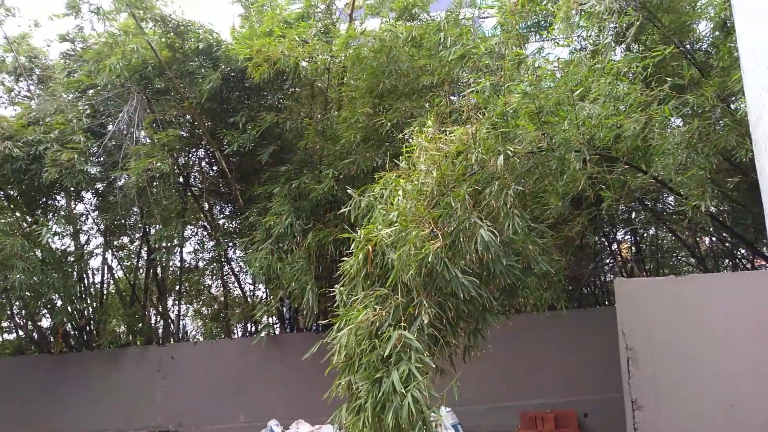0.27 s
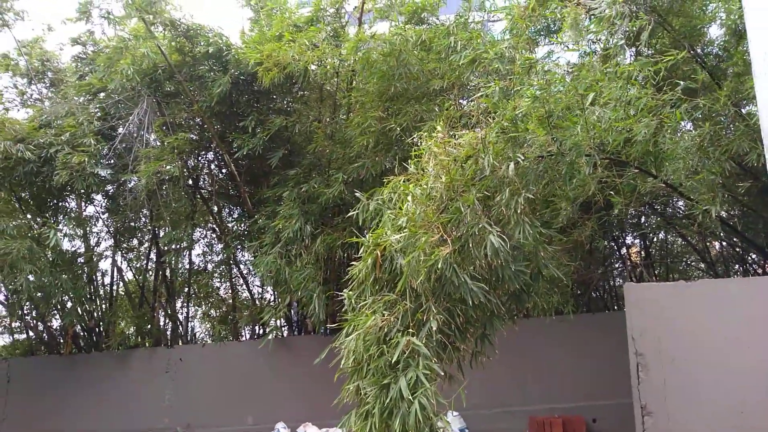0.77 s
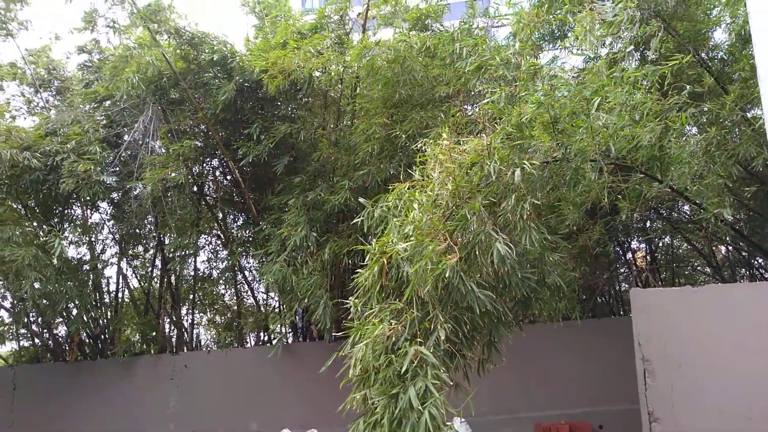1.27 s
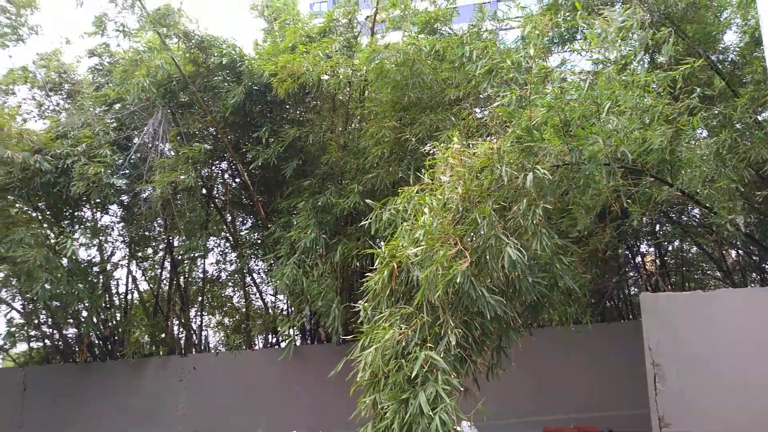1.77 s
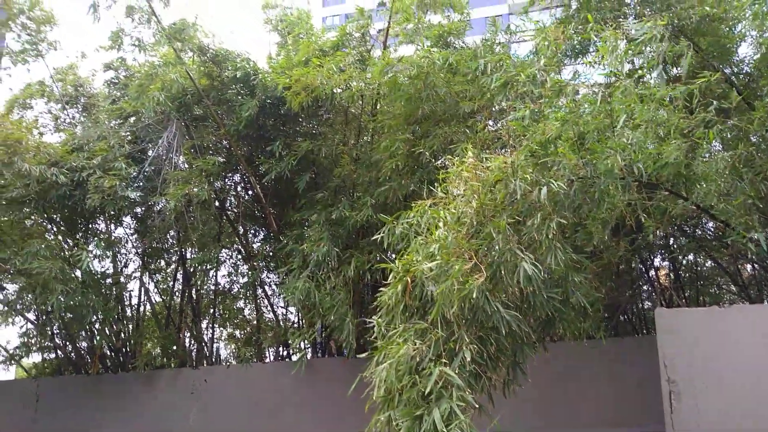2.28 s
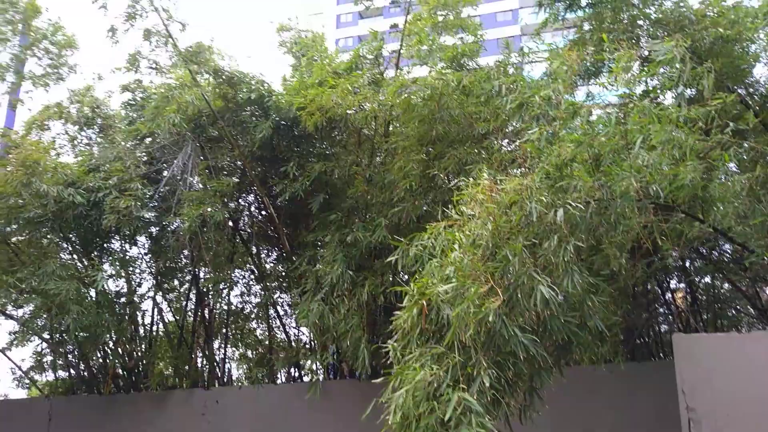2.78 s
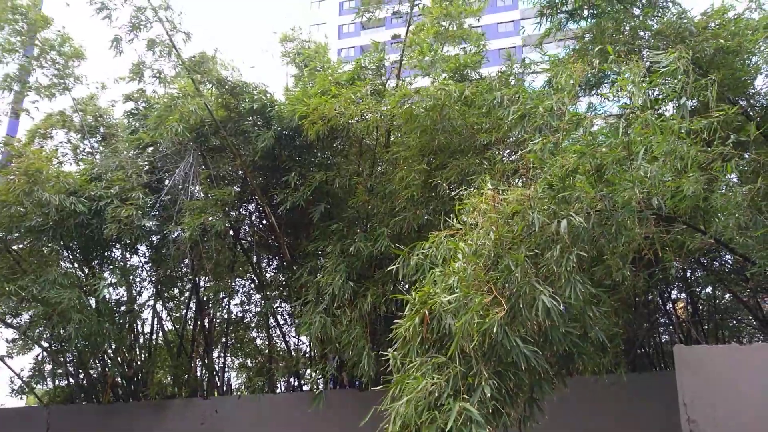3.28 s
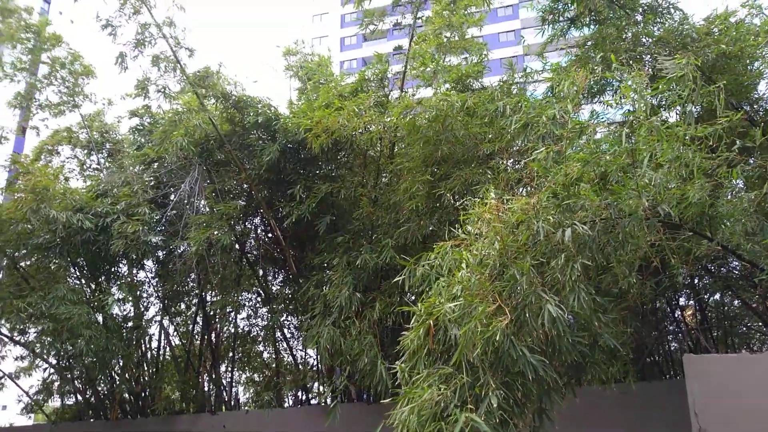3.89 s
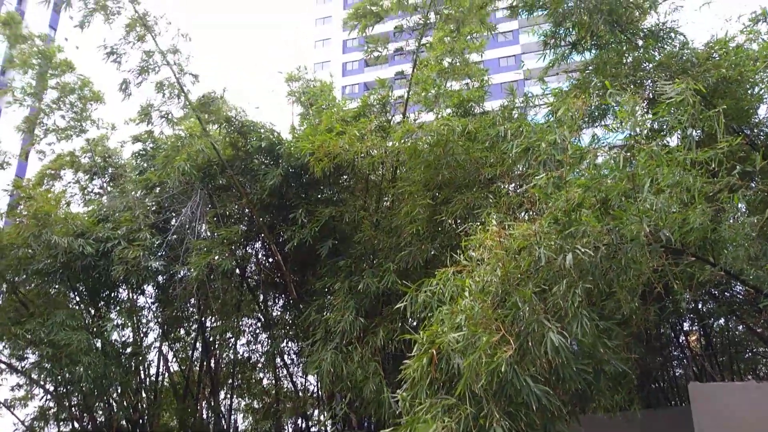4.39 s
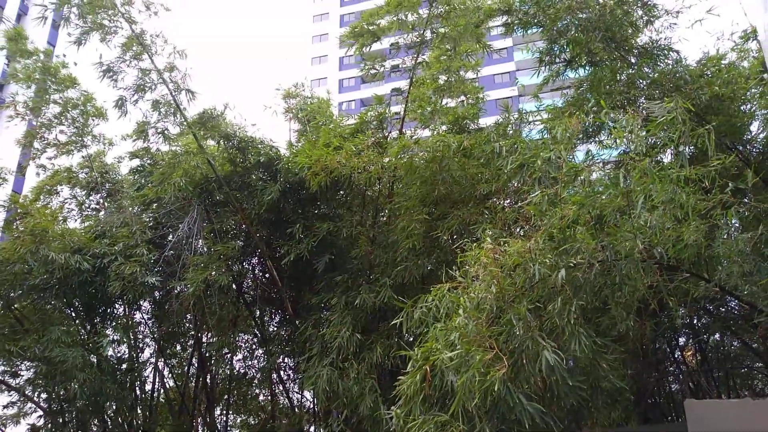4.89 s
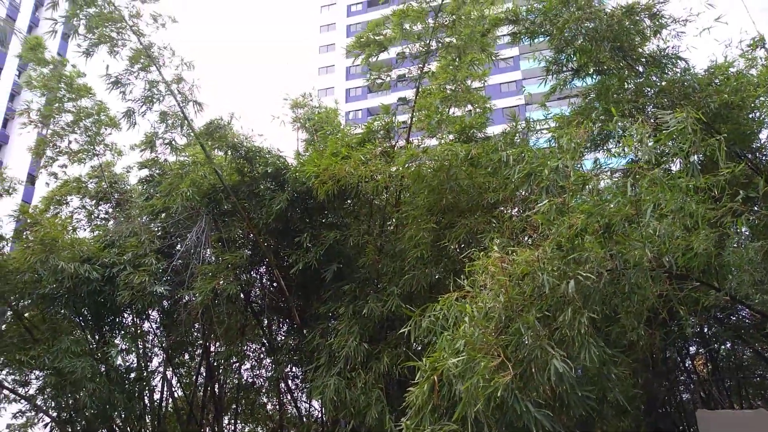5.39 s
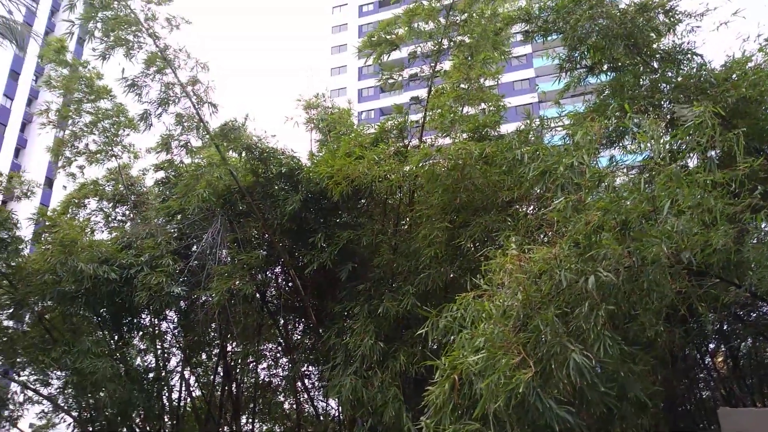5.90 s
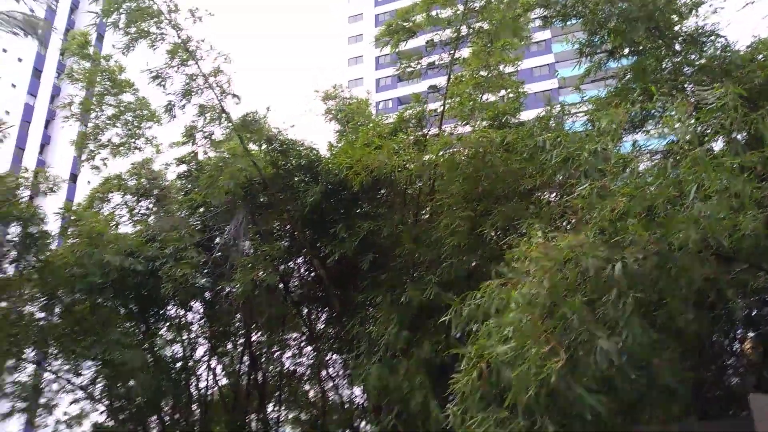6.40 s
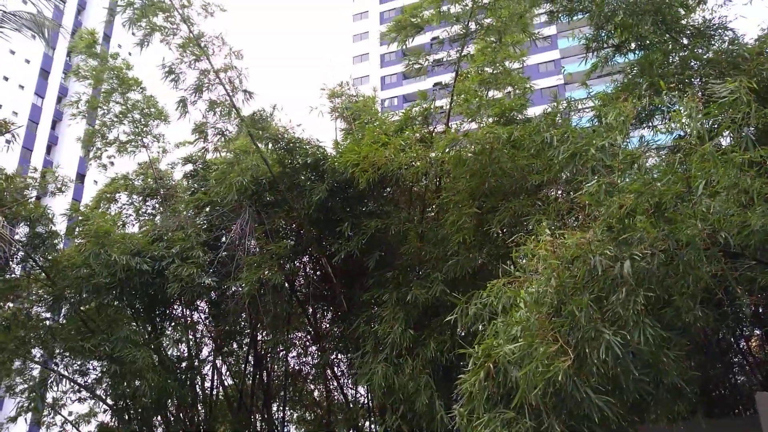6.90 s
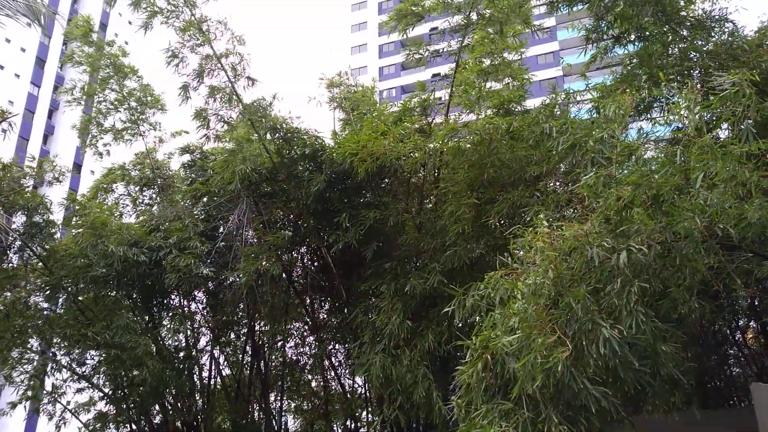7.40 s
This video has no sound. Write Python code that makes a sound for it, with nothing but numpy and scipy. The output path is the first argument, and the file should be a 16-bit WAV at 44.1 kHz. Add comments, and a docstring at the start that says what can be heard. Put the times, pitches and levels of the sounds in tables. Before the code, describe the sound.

A stereo microphone near bamboo picks up even, bright leaf hiss throughout, over an unsteady low machine hum, faint fan drones and dull distant city noise. Faint high bird notes start at once, bunch into a quick twitter, then thin out, smeared by wall reflections. Small dry stem ticks come now and then, sharpest in the later part as the breeze turns more uneven.

```python
"""A light wind rustles bamboo in a walled yard, over a city wash and a throbbing hum; both last throughout.
A small bird sings a first thin note at once; its sliding whistles crowd together from 1.3 s, then thin out.
From about 4 s the wind comes in shorter swells; the sharpest stem clicks come near 5.5 and 6.9 s.
Leaves, boughs, stems, streets and a low rumble are shaped noise; the hum is blurred tones beating together.
The bird is sine waves with bent pitch, smeared by echoes from the walls."""
import sys
import numpy as np
from scipy import signal
from scipy.fft import rfft, irfft
from scipy.io import wavfile
from scipy.ndimage import uniform_filter1d

SR = 44100
rng = np.random.default_rng(int(sys.argv[2]) if len(sys.argv) > 2 else 0)


def store_wav(level_fs):
    """Save 16-bit WAV to argv[1]."""
    pcm = np.round(np.clip(np.atleast_2d(level_fs), -1, 1) * 32767)
    wavfile.write(sys.argv[1], SR, pcm.T.astype(np.int16))


N = 337317  # length in samples

# Wind in the leaves; only the rise and fall about each column's mean is used.
# Each row: time in seconds, level of the fine leaf rustle in dB, level of the deeper bough swish in dB.
WIND_SWELL = [(0.0, -60, -64), (.12, -62.5, -60), (.35, -62.5, -62.5), (.88, -62, -58.5),
              (1.08, -62, -57.5), (1.4, -63, -60), (1.83, -62, -60.5), (2.3, -61.5, -61),
              (2.75, -62, -61.5), (3.05, -62, -60.5), (3.35, -62.5, -61), (3.55, -62, -62.5),
              (3.82, -65.5, -68), (4.2, -65, -59), (4.42, -63, -60), (4.7, -64, -62.5), (4.92, -62.5, -59),
              (5.25, -66.5, -66), (5.52, -60.5, -58), (5.85, -67, -60), (6.15, -65.5, -63.5),
              (6.35, -62.5, -61.5), (6.78, -65, -61), (6.9, -59.5, -62), (7.1, -63.5, -63),
              (7.45, -60.5, -60.5), (7.65, -61.5, -59.5)]
# Hiss of the leaves. Each row: frequency in Hz, level in dB per Hz before the rustle's own strength.
LEAF_SPECTRUM = [(500, -125), (2000, -101), (3600, -100.5), (5000, -94), (7500, -94), (9500, -93.5),
                 (11000, -99), (12500, -103), (14500, -106)]
# Swish of whole boughs. Each row: frequency in Hz, level in dB per Hz before the wind's swell.
BOUGH_SPECTRUM = [(1000, -120), (2600, -100), (4300, -102), (7000, -115)]
# Stems clicking together. Each row: start in seconds, starting level in dB before echo and flutter,
# centre in Hz, reach to either side in octaves, time to fade by 60 dB in seconds.
STEM_CLICKS = [(.037, -54, 2500, .5, .03), (.367, -53, 2800, .7, .03), (.558, -55, 2700, .5, .04),
               (.935, -56, 6000, .9, .12), (2.235, -55, 11000, .4, .15), (2.279, -50, 11500, .35, .03),
               (2.49, -44.5, 9400, .22, .06), (2.99, -46.5, 2500, .4, .04), (3.462, -50, 2400, .35, .03),
               (3.525, -58, 11500, .4, .15), (3.955, -51, 5200, .7, .015), (5.355, -52, 6000, .9, .03),
               (5.511, -39, 7000, .9, .011), (5.529, -41.5, 5500, .9, .022), (6.288, -44, 8800, .45, .025),
               (6.842, -48.5, 2650, .35, .1), (6.853, -46, 2700, .35, .05), (6.845, -47.5, 5800, .5, .1),
               (6.846, -52, 11000, .25, .14), (6.898, -36.5, 8400, .6, .008), (6.95, -50, 6000, .9, .03),
               (7.015, -51, 5500, .9, .025)]
# Bird notes. Each row: start in seconds, length in seconds, first, middle and last pitch in Hz,
# level in dB before echo, buzz as the share by which the pitch quivers.
BIRD_NOTES = [(0.0, 0.12, 4950, 5570, 5970, -57.5, 0.038), (0.527, .052, 5550, 5130, 4720, -58, .04),
              (.95, 0.29, 4250, 4450, 4850, -63, .05), (1.301, .06, 7520, 7570, 7650, -55, 0.0065),
              (1.367, 0.11, 7780, 7620, 7560, -51, 0.013), (1.504, 0.068, 8500, 7600, 6000, -54, 0.037),
              (1.61, 0.097, 7700, 8150, 8500, -56.5, .05), (1.69, .1, 4900, 4950, 4900, -61, .025),
              (1.707, 0.088, 7550, 7220, 7180, -50.5, .016), (1.835, 0.066, 8150, 8240, 8200, -55.5, .016),
              (1.857, .04, 7700, 6900, 6250, -56, 0.042), (1.929, 0.089, 8200, 7630, 7060, -57.5, .035),
              (2.007, 0.07, 7000, 6150, 6120, -51, 0.013), (2.123, 0.097, 6250, 6220, 6100, -56, 0.021),
              (2.18, .045, 7600, 7500, 7300, -55, .024), (2.203, 0.07, 6700, 5650, 4900, -54, 0.02),
              (2.33, 0.096, 7100, 6550, 6160, -56, 0.032), (2.414, .13, 5400, 5020, 4950, -57, 0.02),
              (2.582, 0.055, 7600, 6480, 5600, -52.5, .05), (2.63, 0.063, 5450, 4900, 4300, -56.5, .04),
              (2.993, 0.03, 7870, 8000, 8100, -53, .012), (3.003, 0.084, 10100, 9000, 8300, -57, .055),
              (3.025, .05, 5100, 4900, 4650, -63, 0.022), (3.185, 0.085, 7800, 7400, 6900, -59, 0.018),
              (3.265, 0.055, 6800, 6180, 5730, -54, 0.032), (3.314, .11, 5750, 5600, 5550, -58, 0.018),
              (3.576, 0.14, 5000, 5560, 6050, -58.5, .026), (4.005, .045, 9450, 8880, 8200, -53.5, .03),
              (4.385, .07, 10200, 9950, 9700, -61, .05), (4.72, 0.098, 4400, 4460, 4530, -59, .016),
              (4.791, 0.18, 4650, 6150, 7240, -58, 0.04), (5.172, 0.11, 6900, 6020, 5100, -59, 0.06),
              (5.28, 0.21, 5100, 4750, 5100, -60.5, 0.078), (5.667, 0.085, 6000, 5920, 5900, -57, 0.0086),
              (6.475, 0.16, 6950, 7850, 8100, -58.5, .052), (6.645, 0.048, 7300, 6250, 5550, -55, 0.055),
              (6.686, 0.125, 5750, 5600, 5520, -57.5, 0.042)]
# Swell of the distant machinery. Each row: time in seconds, hum level in dB before a small trim.
HUM_SWELL = [(0.0, -46.5), (.55, -45), (1.1, -39), (1.3, -44), (1.53, -41), (1.75, -44), (2.1, -38.5),
             (2.24, -55), (2.36, -36), (2.47, -49.5), (2.57, -37), (2.72, -40.5), (2.86, -52),
             (3.03, -35.5), (3.3, -44), (3.49, -37), (3.62, -40), (3.87, -47), (4.08, -38), (4.32, -45.5),
             (4.58, -40), (4.76, -43), (4.88, -36.5), (5.05, -37.5), (5.22, -50), (5.4, -39.5),
             (5.6, -37.5), (5.9, -41), (6.18, -45.5), (6.32, -39.5), (6.65, -42.5), (6.85, -40.5),
             (7.2, -46.5), (7.4, -41), (7.65, -45)]
# Faint drones of far fans. Each row: frequency in Hz, level in dB.
FAN_DRONES = [(174, -57), (202, -59.5), (253, -58), (297, -63), (592, -65.5)]
# Swell of the low rumble; only the rise and fall about the mean is used.
# Each row: time in seconds, level in dB.
RUMBLE_SWELL = [(0.0, -45), (.5, -48.5), (0.93, -52), (1.1, -48.5), (1.55, -47.5), (1.75, -51), (2.05, -44),
                (2.23, -52), (2.36, -46.5), (2.85, -48.5), (3.48, -46.5), (3.7, -57), (4.0, -46),
                (4.25, -51), (4.6, -47), (4.95, -57), (5.15, -47), (6.2, -52), (6.52, -48), (6.8, -52),
                (7.65, -52)]
# Low unsteady rumble near 60 Hz, perhaps a fan.
# Each row: frequency in Hz, level in dB per Hz before the rumble's swell.
RUMBLE_SPECTRUM = [(20, -100), (33, -84), (45, -80.5), (56, -61), (68, -63.5), (88, -72), (160, -97),
                   (400, -130)]
# Wash of the city. Each row: frequency in Hz, level in dB per Hz before its slow swell.
CITY_SPECTRUM = [(40, -105), (90, -68.5), (128, -65), (150, -66), (180, -66.5), (300, -71), (520, -72.5),
                 (660, -75), (1000, -77), (1200, -81), (1600, -83.5), (2200, -88.5), (3300, -98),
                 (9000, -120)]
# How alike the left and right channels are. Each row: frequency in Hz, likeness from 0 to 1.
CHANNEL_LIKENESS = [(40, 0.65), (110, 0.86), (190, 0.17), (350, 0.88), (620, 0.72), (1050, 0.98),
                    (1500, 0.92), (2150, 1), (2700, 0.7), (3200, 0.7), (3700, 1), (5500, 1), (6800, 0.35),
                    (11000, 0)]
# How much weaker the right channel is. Each row: frequency in Hz, right below left in dB.
RIGHT_SHADE = [(50, 2.6), (100, 5), (170, 3.6), (270, 3.25), (800, 1.3), (1100, 0.79), (1400, 3.5),
               (2200, 0.34), (3300, 1), (5500, 4.4), (7500, 6.1), (10000, 11.5), (13000, 14)]

# every sample's time in seconds, and every spectrum bin's frequency in Hz
T, HZ = np.arange(N) / SR, np.fft.rfftfreq(N, 1 / SR)
# like machines run at slightly different speeds, so their hums beat
HUM_HZ, HUM_SPREAD_HZ, HUM_WANDER_HZ = 107.1, 5.5, 5.56
NOTE_EDGE_SHARE = .3  # share of a note spent fading in and out, both ends together
PATH_CHANGES_PER_S = 5  # how often the swaying stems change the bird's echo paths
# the right channel lags above the corner, which gives a wide stereo image; both stop near the edge
LAG_S, LAG_CORNER_HZ, EDGE_HZ = .000461, 1085, 14300


def leaves(ticks_per_s=1100, spread_db=2.0, tick_s=0.0017, tick_db=-5.0, hiss_db=-3.0,
           patchy_db=1, flutter_db=0.5, gust=0.64, brighten=.3):
    """Countless far leaves blur into a hiss; near ones tick one by one; gusts lift and brighten it all."""
    wind_db = sway(axis=1)
    # stronger wind makes touches more frequent
    touches = rng.random((2, N)) < ticks_per_s * gain_of(gust * wind_db) / SR
    sizes = gain_of(spread_db * np.minimum(rng.exponential(1, (2, N)), 4.5))
    # every touch is its own tiny scrape, so no two have the same colour
    fade = np.exp(-1 / (tick_s * SR))
    scraping = signal.lfilter([1], [1, -fade], (touches * sizes) ** 2)
    ticks = evened(np.sqrt(scraping) * rng.standard_normal((2, N)))
    hiss = rng.standard_normal((2, N))
    rustle = gain_of(hiss_db) * hiss + gain_of(tick_db) * ticks

    hz, t, z = signal.stft(rustle, SR, nperseg=512)
    # each spray of leaves briefly lifts its own part of the spectrum
    sprays = uniform_filter1d(rng.standard_normal(z.shape[1:]), size=22, axis=0)
    sprays = uniform_filter1d(sprays, size=16, axis=1)
    # above 8 kHz the gusts count for more, below it for less
    wind_share = gust + brighten * np.log2(np.maximum(hz, 2000) / 8000)
    swell_db = np.outer(wind_share, np.interp(t, T, wind_db))
    z = z * gain_of(patchy_db * evened(sprays) + swell_db)
    rustle = signal.istft(z, nperseg=512)[1][:, :N]
    return coloured(rustle * gain_of(flutter_db * drift(14)), LEAF_SPECTRUM)


def boughs(gust=1.5):
    """Whole boughs brush past each other with a deeper swish: noise that swells with the wind."""
    swish = rng.standard_normal((2, N)) * gain_of(gust * sway(axis=2))
    return coloured(swish, BOUGH_SPECTRUM)


def sway(axis):
    """The wind's swell in dB about its mean, smoothed over a fifth of a second."""
    level_db = uniform_filter1d(follow(WIND_SWELL, axis=axis), size=9000)
    return level_db - level_db.mean()


def bird(rasp_db=-8, rasp_width=.06):
    """Each note is a whistle sliding along an arc, clear or buzzy, in a wider airy rasp, with echoes."""
    song = np.zeros(N)
    quivers = np.array([drift(454), drift(900)])  # for the whistle and the rasp
    for s, length, first_hz, middle_hz, last_hz, db, buzz in BIRD_NOTES:
        u = np.linspace(0, 1, max(round(length * SR), 8))
        arc = np.polyfit([0, .5, 1], [first_hz, middle_hz, last_hz], 2)
        quiver = quivers[:, max(round(s * SR), 0):][:, :len(u)]
        depth = np.array([[buzz], [buzz + rasp_width]])
        hz = np.polyval(arc, u) * (1 + depth * quiver)
        whistle, rasp = np.sin(2 * np.pi * np.cumsum(hz, axis=1) / SR)
        note = (whistle + gain_of(rasp_db) * rasp) * signal.windows.tukey(len(u), NOTE_EDGE_SHARE)
        add(song, s, gain_of(db) * evened(note))
    # swaying stems keep changing the echo paths: three sets take turns, their powers summing to one
    turns = [np.sqrt(2 / 3) * np.cos(np.pi * (PATH_CHANGES_PER_S * T + k / 3)) for k in range(3)]
    near_walls = sum(yard(song * turn, t60=.46, wet_db=14) for turn in turns)
    tall_buildings = yard(song, t60=1.2, wet_db=20)
    return gain_of(-9) * song + gain_of(-1.3) * near_walls + gain_of(-9) * tall_buildings


def stems():
    """Dry stems knock and scrape in short noise bursts: low from thick canes, bright and broad from twigs."""
    out, t = np.zeros((2, N)), np.arange(8192) / SR
    hz = np.fft.rfftfreq(len(t), 1 / SR) + 1
    dull = 1 / np.sqrt(1 + (hz / 11300) ** 12)  # takes off the highest treble
    for s, db, centre_hz, octaves, t60 in STEM_CLICKS:
        band = np.exp(-(np.log2(hz / centre_hz) / octaves) ** 2)
        burst = irfft(rfft(rng.standard_normal((2, len(t)))) * dull * band)
        add(out, s, gain_of(db - 60 * t / t60) * evened(burst))
    uneven = out * gain_of(drift(200))
    return yard(uneven, t60=.28, wet_db=-5)


def yard(x, t60, wet_db):
    """Direct sound plus dense fading scatter from walls and stems, different in each channel."""
    t = np.arange(SR) / SR
    tail = rng.standard_normal((2, len(t))) * gain_of(-60 * t / t60)
    tail *= gain_of(wet_db) / np.linalg.norm(tail[0])
    tail[0, 0] += 1  # the direct sound goes into the first channel only
    echoed = signal.fftconvolve(np.atleast_2d(x), tail, axes=1)[:, :N]
    return echoed / np.linalg.norm(tail[0])


def machinery(hum_db=-2.1, evenness=0.66):
    """Hums of nearly the same pitch beat against each other; a few faint drones lie above them."""
    pitches = HUM_HZ + HUM_SPREAD_HZ * np.linspace(-1, 1, 4)
    beating = sum(tone(hz, width_hz=HUM_WANDER_HZ) for hz in pitches)
    # partly level out the beats, then lay the slow swell on top
    power = uniform_filter1d(beating ** 2, size=9000)
    hum = evened(beating / power ** (evenness / 2)) * gain_of(follow(HUM_SWELL) + hum_db)
    drones = sum(gain_of(db) * tone(hz, width_hz=4.35, steadiness=0.58) for hz, db in FAN_DRONES)
    return hum + drones


def tone(hz, width_hz, steadiness=0.69):
    """A blurred tone of unit rms, wandering in pitch and partly in strength."""
    wander = drift(width_hz) + 1j * drift(width_hz)
    power = uniform_filter1d(abs(wander) ** 2, size=4000) + 1e-6
    steadied = wander / power ** (steadiness / 2)
    return evened((steadied * np.exp(2j * np.pi * hz * T)).real)


def city(swell_db=0.35, fade_db_per_s=-0.0657, surge=0.85):
    """An even noise wash of far streets above a low rumble that swells and sinks."""
    wash = coloured(rng.standard_normal((2, N)), CITY_SPECTRUM)
    wash = wash * gain_of(swell_db * drift(2.5) + fade_db_per_s * (T - T.mean()))
    rumble_db = follow(RUMBLE_SWELL)
    rumble_gain = gain_of(surge * (rumble_db - rumble_db.mean()))
    return wash + coloured(rng.standard_normal((2, N)) * rumble_gain, RUMBLE_SPECTRUM)


def gain_of(db):
    """Decibels to amplitude."""
    return 10 ** (np.asarray(db) / 20)


def evened(x):
    """Scales to unit rms, an average strength of one."""
    return x / np.sqrt(np.mean(abs(x) ** 2) + 1e-20)


def read(points, hz):
    """Reads a frequency table at any pitch, on a log-frequency axis."""
    f, value = np.transpose(points)
    return np.interp(np.log(hz + 1), np.log(f), value)


def follow(curve, axis=1):
    """One column of a time curve at every sample."""
    columns = np.transpose(curve)
    return np.interp(T, columns[0], columns[axis])


def add(mix, s, sound):
    """Mixes a sound in at time s, in seconds."""
    part = mix[..., max(round(s * SR), 0):][..., :sound.shape[-1]]
    part += sound[..., :part.shape[-1]]


def coloured(x, spectrum):
    """Shapes noise by a spectrum in dB per Hz, which holds exactly for white noise of unit rms."""
    return irfft(rfft(x) * gain_of(read(spectrum, HZ)) * np.sqrt(SR / 2), N)


def drift(rate_hz):
    """Smooth chance of unit rms, up to about this rate."""
    return evened(irfft(rfft(rng.standard_normal(N)) * np.exp(-(HZ / rate_hz) ** 2), N))


def scene():
    """Everything heard in the two channels."""
    hum = machinery()
    other_hum = machinery()
    return leaves() + boughs() + bird() + stems() + np.array([hum, other_hum]) + city()


def record(dry):
    """The right channel shares part of the left, lagging and duller; then both lose the top treble."""
    left, other = rfft(dry)
    same = np.clip(read(CHANNEL_LIKENESS, HZ), 0, 1)
    lag = np.exp(-2j * np.pi * LAG_S * np.maximum(HZ - LAG_CORNER_HZ, 0))
    right = same * lag * left + np.sqrt(1 - same ** 2) * other
    right = right * gain_of(-read(RIGHT_SHADE, HZ))
    low_pass = signal.firwin(1023, EDGE_HZ, window=("kaiser", 9), fs=SR)
    return signal.oaconvolve(irfft(np.array([left, right]), N), low_pass[None], "same")


dry = scene()
out = record(dry)
store_wav(out)
```